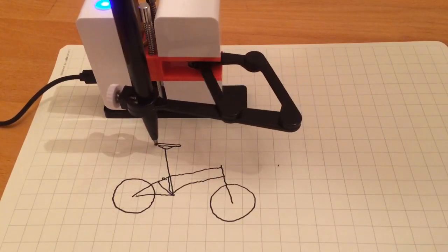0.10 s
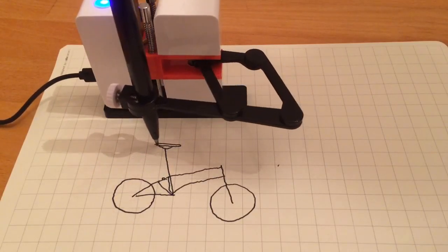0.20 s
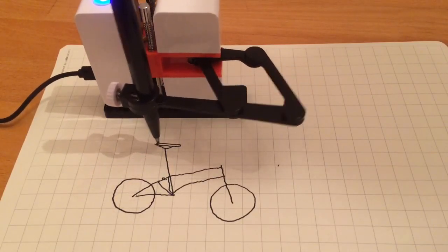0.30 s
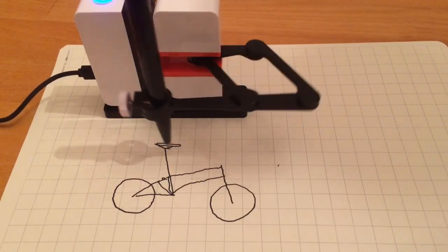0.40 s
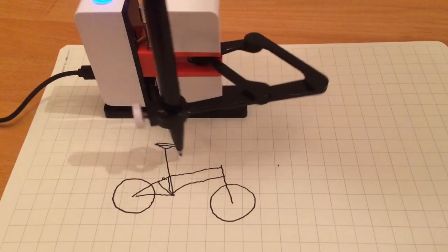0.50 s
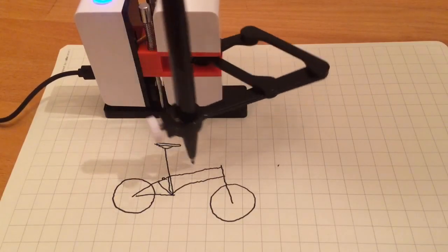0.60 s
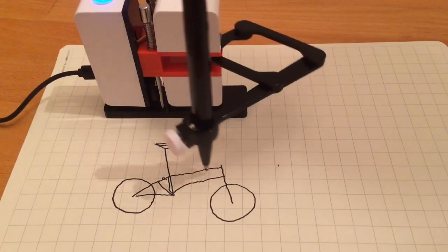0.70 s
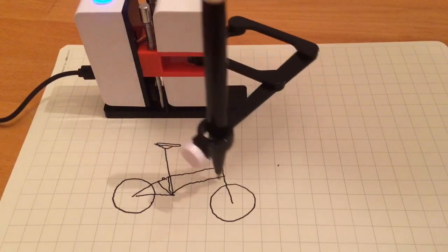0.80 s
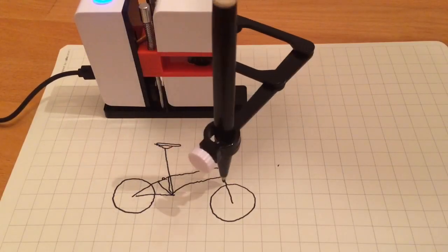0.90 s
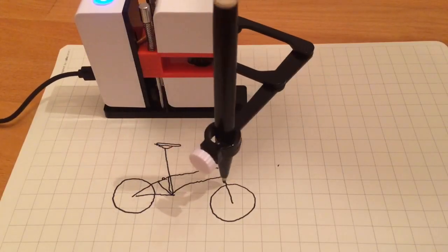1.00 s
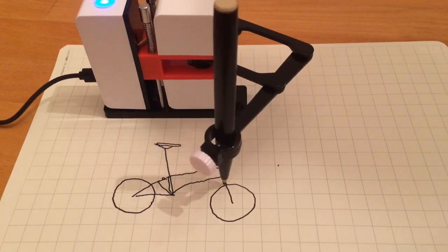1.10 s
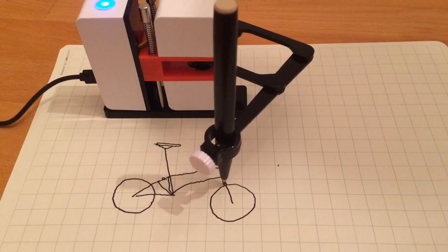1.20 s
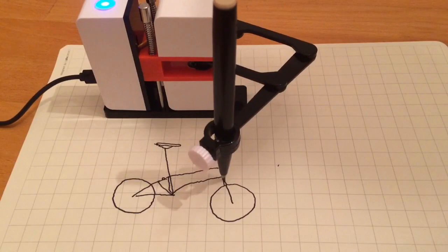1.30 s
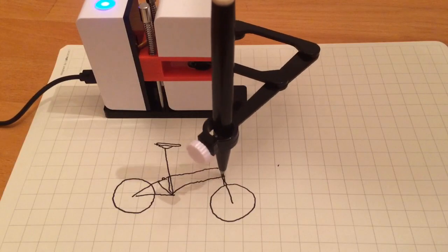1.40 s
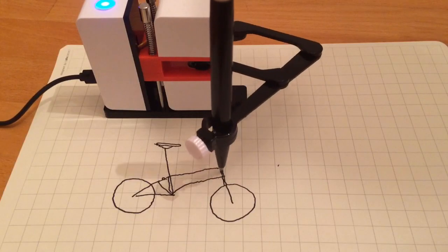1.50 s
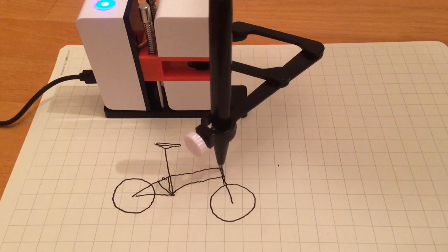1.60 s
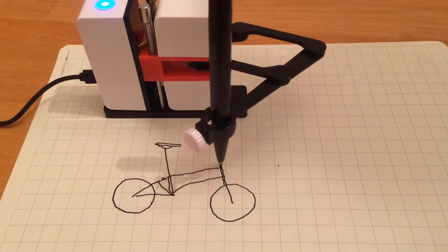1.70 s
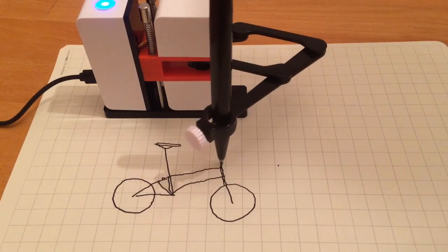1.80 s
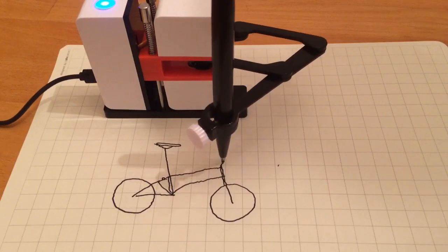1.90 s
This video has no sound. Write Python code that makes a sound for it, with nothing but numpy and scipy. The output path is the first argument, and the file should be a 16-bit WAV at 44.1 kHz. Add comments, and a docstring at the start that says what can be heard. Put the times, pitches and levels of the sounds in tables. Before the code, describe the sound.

A little drawing robot's servos whine, rattle and squeak through one quick pen move, then buzz faintly

```python
"""Faint buzzing creep and small jerks come first: the servos of a small desktop drawing arm on a wooden table.
Then a pen-lift servo whines, made of overtones of one moving pitch over gear rattle; it whines again later.
Between the whines the arm swings across: tooth impacts, friction noise, gear catches and sliding squeaks.
Creep is noise in small drive pulses, the pen holder knocks in noise puffs, and noise through low resonances
makes the table thrum. A steady room noise lies underneath, all heard by one close microphone."""
import sys
import numpy as np
from scipy import signal
from scipy.fft import rfft, irfft, next_fast_len
from scipy.io import wavfile
from scipy.ndimage import uniform_filter1d

SR = 44100
rng = np.random.default_rng(int(sys.argv[2]) if len(sys.argv) > 2 else 0)


def transcribe(u):
    """Save the signal u as a 16-bit wav file named by the first command-line argument.

    u: samples, shape (n,) or (channels, n), limited to [-1, 1]; the rate is SR.
    q: integer samples, one column per channel.
    """
    v = np.clip(np.atleast_2d(u).T, -1, 1)
    q = np.round(v * 32767).astype(np.int16)
    wavfile.write(sys.argv[1], SR, q)


def level_to_linear(level):
    """Convert decibel levels to linear amplitude factors, elementwise."""
    exponent = np.asarray(level, float) / 20
    return 10 ** exponent


N = 83790  # length of the scene in samples


def drift(rate_hz):
    """Slow random wander of spread 1: noise smoothed by two equal low-pass poles."""
    r = np.exp(-2 * np.pi * rate_hz / SR)
    noise = rng.standard_normal(N + SR // 2)
    slow = signal.lfilter([1], [1, -2 * r, r * r], noise)[SR // 2:]  # skip the filter's start-up
    return slow / slow.std()


def curve(rows):
    """Columns of a table drawn out in time, then a soft-edged gate that is open only inside the table."""
    start_s, *columns = np.transpose(rows)
    t = np.arange(N) / SR
    inside = 1. * ((t >= start_s[0]) & (t <= start_s[-1]))
    gate = uniform_filter1d(inside, size=200)
    return [np.interp(t, start_s, column) for column in columns] + [gate]


def level(tables):
    """Loudness over time, as a gain, from one or more tables of start_s, level_db."""
    return sum(level_to_linear(db) * gate for db, gate in map(curve, tables))


def body(x, slope, peaks):
    """Casing as a causal filter: resonances on a broad slope, scaled so that unit white noise stays unit."""
    size = next_fast_len(N + SR // 4)
    hz = np.maximum(np.arange(size // 2 + 1) * SR / size, 1)
    slope_hz, slope_db = [p[0] for p in slope], [p[1] for p in slope]
    gain = level_to_linear(np.interp(np.log(hz), np.log(slope_hz), slope_db))
    # each peak adds half its listed boost, as an amplitude
    boost = sum(level_to_linear(db) / np.sqrt(1 + (2 * (hz - f) / w) ** 4) for f, w, db in peaks) * .5
    gain = gain * (1 + boost)
    # folding the cepstrum gives minimum phase: nothing sounds before it is struck
    cepstrum = irfft(np.log(gain / np.sqrt(np.mean(gain ** 2))), size)
    cepstrum[1:size // 2] *= 2
    cepstrum[size // 2 + 1:] = 0
    return irfft(rfft(x, size) * np.exp(rfft(cepstrum)), size)[:N]


def bursts(rows, decay_s):
    """Small impacts: a quickly rising, dying puff of noise at each start_s, strength_db."""
    out, t = np.zeros(N + 2000), np.arange(2000) / SR
    envelope = np.exp(-t / decay_s) * (1 - np.exp(-t / decay_s * 8))
    puffs = rng.standard_normal((len(rows), 2000)) * envelope
    for (start_s, strength_db), puff in zip(rows, puffs):
        start = int(start_s * SR)
        out[start:start + 2000] += level_to_linear(strength_db) * puff
    return out[:N]


def rattle():
    """Gear rattle: uneven tooth impacts over friction noise, in louder and softer patches; rms 1."""
    teeth_per_s, spread_db, patch_db = 2500, 1.5, 1.5
    tooth_share = .52  # the rest is friction
    struck = rng.random(N) < teeth_per_s / SR
    strength = level_to_linear(spread_db * np.minimum(rng.exponential(1, N), 4))
    hits = struck * strength * rng.choice([-1, 1], N)
    x = tooth_share * hits / hits.std() + (1 - tooth_share) * rng.standard_normal(N)
    x = x * level_to_linear(patch_db * drift(17.5))
    return x / x.std()


# pen-lift servo whine, up then down: start_s, pitch_hz (lowest whine tone), level_db
LIFT_UP_WHINE = [(0.213, 310, -76), (0.236, 435, -61), (0.252, 480, -52), (0.282, 505, -45),
                 (0.297, 508, -56), (0.315, 510, -46), (0.355, 514, -44), (0.367, 513, -58),
                 (0.378, 511, -58), (0.39, 508, -46), (0.418, 495, -48), (0.445, 450, -56),
                 (0.458, 420, -80)]
LIFT_DOWN_WHINE = [(1.058, 370, -80), (1.074, 430, -60), (1.09, 495, -65), (1.105, 526, -57),
                   (1.136, 536, -50), (1.237, 537, -51), (1.256, 528, -53), (1.268, 500, -70)]
# whine overtones: multiple of the pitch, up_db and down_db (relative to the whine level)
WHINE_OVERTONES = [(1, -16, -12), (2, -9, -22), (3, 0, 0), (5, -13, -2), (6, -11, -6), (7, -18, -14),
                   (9, -10, -11), (15, -10, -40), (27, -4, -40)]
# gear rattle of the lift servo, one list per stroke: start_s, level_db
LIFT_RATTLE_LEVEL = [
    [(0.2, -78), (0.225, -47), (0.26, -38), (0.44, -38.5), (0.46, -45), (0.48, -37)],
    [(1.04, -79), (1.058, -43.5), (1.08, -40.5), (1.25, -39.5), (1.272, -40.5), (1.277, -41), (1.29, -47),
     (1.297, -56)],
]
# broad tone colour of the lift rattle: pitch_hz, density_db (relative, per Hz)
LIFT_SLOPE = [(200, -15), (700, -21.5), (1400, -11), (2000, -23), (3000, -8.5), (4400, -12), (6000, -9),
              (10000, -9), (15700, -3.5)]
# ringing of the lift casing: pitch_hz, width_hz, boost_db (halved as amplitude in body)
LIFT_RINGING = [(5770, 150, 11), (7500, 700, 6)]


def lift():
    """Pen-lift servo: commutator whine with overtones on a moving pitch, and gear rattle in each stroke."""
    waver_db, jitter = 2.5, .002  # jitter is a share of the pitch
    hold = .55  # share of the whine's dips that the lowest and highest overtones ignore
    out = body(rattle() * level(LIFT_RATTLE_LEVEL), LIFT_SLOPE, LIFT_RINGING)
    for k, stroke in enumerate((LIFT_UP_WHINE, LIFT_DOWN_WHINE)):
        hz, db, gate = curve(stroke)
        smooth_hz = uniform_filter1d(hz, size=600)
        turn = 2 * np.pi * np.cumsum(smooth_hz * (1 + jitter * drift(59))) / SR
        for row in WHINE_OVERTONES:
            multiple, overtone_db = row[0], row[1 + k]
            if multiple == 3:
                ignored = 0  # the third follows the whine level fully
            elif 1 < multiple < 9:
                ignored = hold / 2
            else:
                ignored = hold
            fade_db = -ignored * (db - db.max())
            gain = level_to_linear(db + overtone_db + fade_db + waver_db * drift(63))
            tone = np.sin(round(multiple) * turn + rng.uniform(0, 7.1))
            out += np.sqrt(2) * gate * gain * tone
    return out


# each arm servo's rattle through the swing: start_s, level_db
SWING_LEVEL = [(0.2, -57), (0.225, -48.5), (0.3, -53.5), (0.46, -44), (0.55, -44.5), (0.68, -43.5),
               (0.8, -45.5), (0.94, -47.5), (0.965, -59)]
# broad tone colour of the swing sound, with a steep treble cut at 15 kHz: pitch_hz, density_db (relative, per Hz)
SWING_SLOPE = [(350, -31.5), (800, -26), (1200, -24.5), (2000, -18), (3200, -10), (6000, -5.5), (9000, -5),
               (12000, -7.5), (14900, -4.5), (15200, -48)]
# ringing of the arm casing: pitch_hz, width_hz, boost_db (halved as amplitude in body)
ARM_RINGING = [(1537, 166, 26), (2750, 520, 19), (5020, 260, 8.5), (6370, 530, 3), (7020, 220, 8.5),
               (8590, 820, 12), (3435, 59, 12), (14000, 400, 2)]
# gear teeth catching: start_s, strength_db (before the casing filter)
TOOTH_CATCHES = [(0.5524, -32), (0.593, -31), (0.7184, -28), (0.7545, -32), (0.7705, -29)]
# fainter, slightly longer jerks while creeping: start_s, strength_db (before the casing filter)
CREEP_JERKS = [(0.008, -45), (0.0175, -43), (0.03, -45), (0.054, -48), (0.089, -47), (0.105, -46),
               (0.117, -46), (0.121, -48), (0.138, -49)]
# faint tone of the arm motor: start_s, pitch_hz and level_db (both before wavering)
MOTOR_TONE = [(0.455, 620, -72), (0.47, 619, -63), (0.56, 600, -69), (0.67, 630, -66), (0.69, 580, -73),
              (0.74, 640, -69), (0.8, 562, -66), (0.86, 570, -70), (0.94, 575, -65)]


def swing():
    """Arm servos: two rattles, each with its share of the ringing, plus catches, jerks and a thin wavering tone."""
    hz, db, gate = curve(MOTOR_TONE)
    turn = 2 * np.pi * np.cumsum(hz * (1 + .022 * drift(30))) / SR
    tone = gate * level_to_linear(db + 3.5 * drift(25)) * np.sin(turn)
    impacts = bursts(TOOTH_CATCHES, decay_s=.0008) + bursts(CREEP_JERKS, decay_s=.0014)
    out = tone + body(impacts, SWING_SLOPE, ARM_RINGING)
    for k in range(2):
        out += body(rattle() * level([SWING_LEVEL]), SWING_SLOPE, ARM_RINGING[k::2])
    return out


# gear squeaks that slide down as the arm loads: start_s, length_s, start_hz, end_hz, level_db
GEAR_SQUEAKS = [(0.561, 0.035, 2933, 2447, -48.5), (0.776, 0.045, 2730, 2540, -49),
                (0.804, 0.077, 2660, 2305, -52)]


def squeaks():
    """Gear squeaks: rough narrow tones that glide downward under a rounded swell."""
    rough_hz = 110
    out, t = np.zeros(N), np.arange(N) / SR
    for start_s, length_s, start_hz, end_hz, level_db in GEAR_SQUEAKS:
        progress = np.clip((t - start_s) / length_s, 0, 1)
        turn = 2 * np.pi * np.cumsum(start_hz + (end_hz - start_hz) * progress) / SR
        # two wandering strengths, a quarter turn apart, roughen the tone
        tone = drift(rough_hz) * np.sin(turn) + drift(rough_hz) * np.cos(turn)
        out += level_to_linear(level_db) * np.sin(np.pi * progress) * tone
    return out


# creeping servos together, one list per stretch, before surges: start_s, level_db
CREEP_LEVEL = [
    [(0.0, -68), (0.02, -61), (0.06, -57), (0.077, -71), (0.16, -60), (0.185, -50), (0.203, -69.5),
     (0.215, -56)],
    [(0.96, -56.5), (1.0, -60), (1.04, -60), (1.06, -51)],
    [(1.29, -54.5), (1.35, -54.5), (1.5, -58), (1.85, -58.5), (1.9, -64)],
]
# broad tone colour of the creep: pitch_hz, density_db (relative, per Hz)
CREEP_SLOPE = [(700, -20.5), (1250, -19), (1700, -11), (3500, -7.5), (4500, -8.5), (6000, -7.5),
               (9000, -9.5), (10500, -17), (15700, -17.5)]
# ringing of the creeping casing: pitch_hz, width_hz, boost_db (halved as amplitude in body)
CREEP_RINGING = [(3320, 250, 10), (5000, 250, 11), (3920, 150, 13), (6000, 500, 12), (2650, 150, 7),
                 (7500, 400, 7)]
# short surges of the second servo: middle_s, rise_db (above that servo's creep)
CREEP_SURGES = [(1.446, 6), (1.517, 7), (1.548, 8), (1.635, 5), (1.685, 7), (1.743, 6)]


def creep():
    """Two creeping servos: drive pulses of uneven strength nudge the gears and stutter; the second one surges."""
    drive_hz, pulse_decay_s, pulse_spread_db = 306.5, .0026, 2.6
    stutter_db, stutter_hz, surge_s = 2.2, 60, .007
    out, t = 0, np.arange(N) / SR
    surge_db = sum(db * np.exp(-((t - s) / surge_s) ** 2 / 2) for s, db in CREEP_SURGES)
    for k in range(2):
        beat = t * drive_hz + rng.random()
        strengths = level_to_linear(pulse_spread_db * rng.standard_normal(N // 50))[beat.astype(int)]
        since_pulse_s = (beat % 1) / drive_hz
        pulses = rng.standard_normal(N) * strengths * np.exp(-since_pulse_s / pulse_decay_s)
        x = pulses * level_to_linear(stutter_db * drift(stutter_hz))
        x = x / x.std() * level_to_linear(k * surge_db) * level(CREEP_LEVEL)
        out = out + body(x, CREEP_SLOPE, CREEP_RINGING[k::2])
    return out / np.sqrt(2)


# pen holder meeting its stops: start_s, strength_db (before the holder filter)
STOP_KNOCKS = [(0.214, -43.5), (0.221, -40.5), (0.229, -46), (0.41, -42), (0.422, -35), (0.434, -35.5),
               (0.445, -33), (1.054, -45), (1.068, -45), (1.266, -36.5), (1.27, -38), (1.286, -40)]
# ringing of the pen holder: pitch_hz, width_hz, boost_db (halved as amplitude in body)
HOLDER_RINGING = [(1480, 400, 28), (2700, 300, 26), (3250, 800, 32)]


def knocks():
    """Pen holder hitting its stops: short noise puffs ring the holder's resonances."""
    slope = [(300, -6.0), (6000, -4.5), (15000, -47)]  # pitch_hz, density_db
    return body(bursts(STOP_KNOCKS, decay_s=.0045), slope, HOLDER_RINGING)


# table thrum over time: start_s, level_db (added to each mode's own level)
THRUM_LEVEL = [(0.0, -71), (0.2, -65.5), (0.26, -53.5), (0.33, -50.5), (0.38, -56.5), (0.47, -61),
               (0.64, -60), (0.72, -76), (0.85, -56), (1.03, -68.5), (1.1, -57.5), (1.16, -56.5),
               (1.23, -64), (1.27, -46), (1.31, -64.5), (1.4, -55.5), (1.46, -74), (1.68, -69.5),
               (1.76, -63.5), (1.8, -67.5), (1.9, -66)]
# low table modes: pitch_hz, width_hz (of the first of two filters), level_db (relative)
TABLE_MODES = [(55, 44, -12.5), (86.2, 24, -1.5), (131.5, 27.4, -8), (175.8, 18.5, -12.5)]


def table():
    """Motor shaking, as noise through two resonators per mode, sets the low table modes going."""
    out = 0
    for hz, width, db in TABLE_MODES:
        r = np.exp(-np.pi * width / SR)
        cosine = np.cos(2 * np.pi * hz / SR)
        y = rng.standard_normal(N + SR)
        y = signal.lfilter([1, 0, -1], [1, -2 * r * cosine, r * r], y)
        # the second resonator is twice as wide; the first second is start-up
        y = signal.lfilter([1, 0, -1], [1, -2 * r ** 2 * cosine, r ** 4], y)[SR:]
        out = out + level_to_linear(db) * y / y.std()
    return out * level([THRUM_LEVEL])


# tone colour of the room noise: pitch_hz, density_db (relative, per Hz)
ROOM_SLOPE = [(25, -29), (90, -4.5), (250, -11), (450, -15), (700, -9), (1100, -15), (3000, -15),
              (16000, -31)]


def room():
    """Steady background: white noise shaped by a broad slope, without resonances."""
    level_db = -67.5
    return level_to_linear(level_db) * body(rng.standard_normal(N), ROOM_SLOPE, [])


def scene():
    """All sources reach one microphone, giving two identical channels."""
    mix = lift() + swing() + squeaks() + creep() + knocks() + table() + room()
    return np.tile(mix, (2, 1))


# narrow steady dips in the treble: pitch_hz, width_hz, depth (share taken away, 0 to 1)
TREBLE_DIPS = [(4280, 200, .7), (5300, 150, .7), (6750, 150, .6), (8100, 250, .8), (10100, 350, .5),
               (11700, 300, .6), (13400, 300, .6)]


def roll_off(x):
    """The treble ends steeply here."""
    return signal.sosfilt(signal.butter(12, 15890, fs=SR, output="sos"), x)


def record(dry):
    """Microphone sound with narrow treble dips: a share of each narrow band is subtracted in turn."""
    for hz, width, depth in TREBLE_DIPS:
        r = np.exp(-np.pi * width / SR)
        top = (1 - r * r) / 2 * np.array([1, 0, -1])
        bottom = [1, -2 * r * np.cos(2 * np.pi * hz / SR), r * r]
        dry = dry - depth * signal.lfilter(top, bottom, dry)
    return roll_off(dry)


dry = scene()
out = record(dry)
transcribe(out)
```